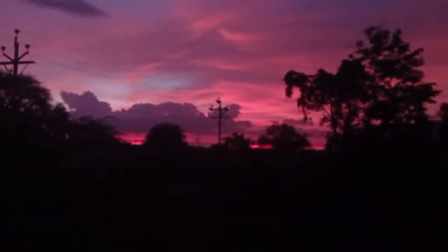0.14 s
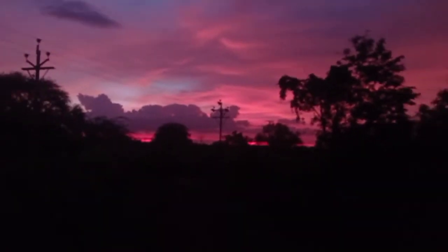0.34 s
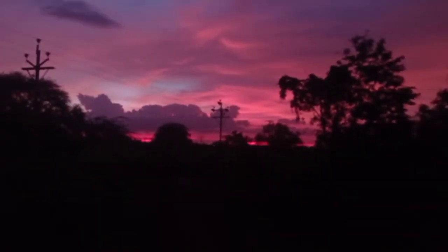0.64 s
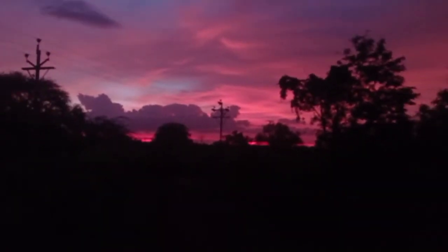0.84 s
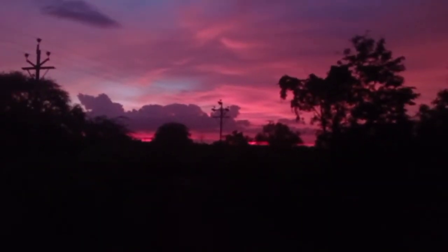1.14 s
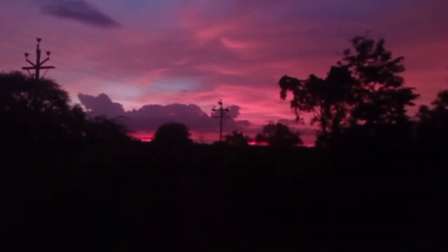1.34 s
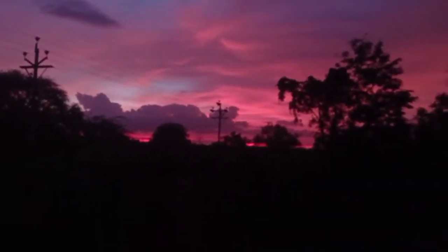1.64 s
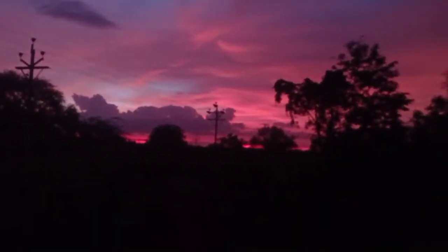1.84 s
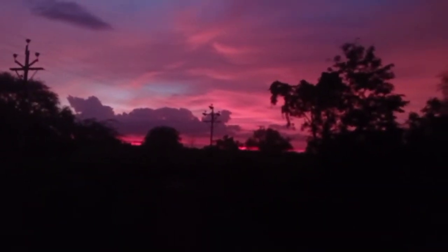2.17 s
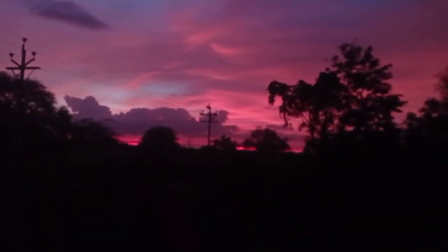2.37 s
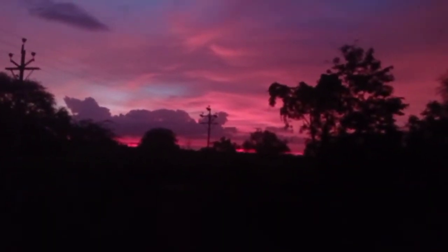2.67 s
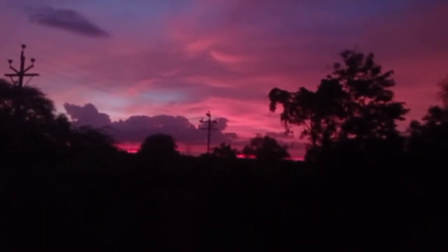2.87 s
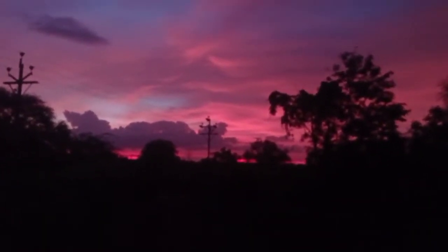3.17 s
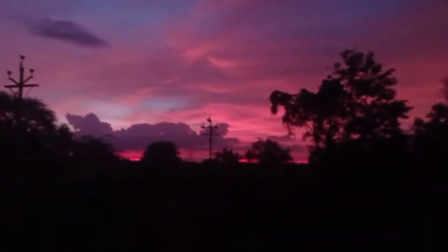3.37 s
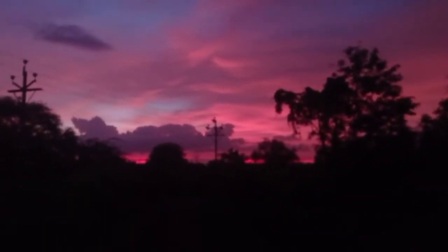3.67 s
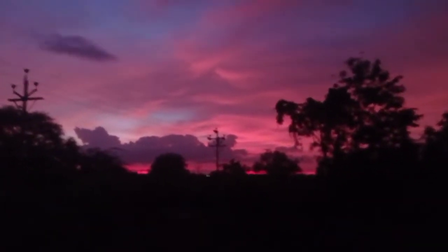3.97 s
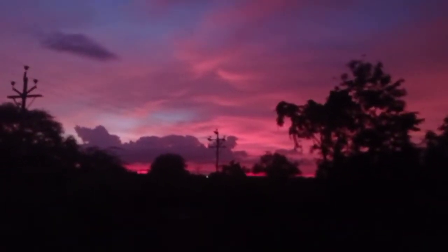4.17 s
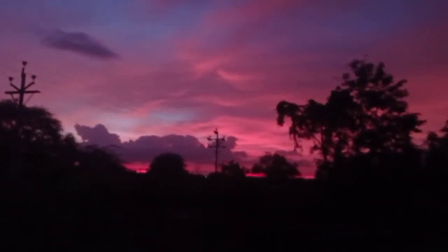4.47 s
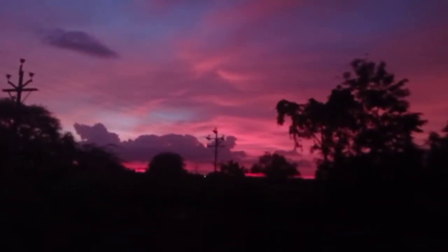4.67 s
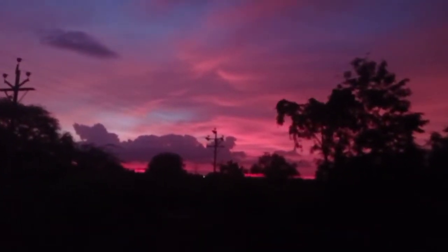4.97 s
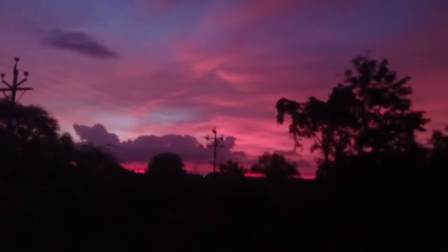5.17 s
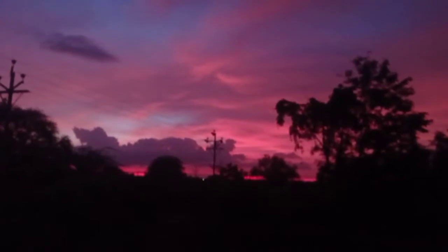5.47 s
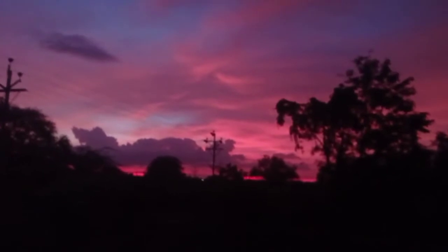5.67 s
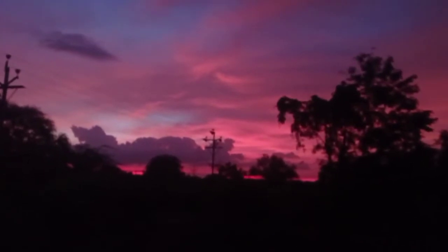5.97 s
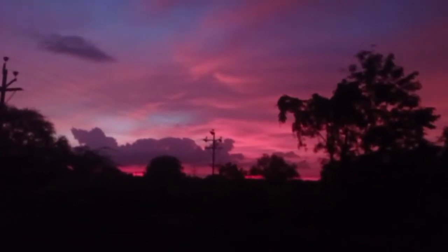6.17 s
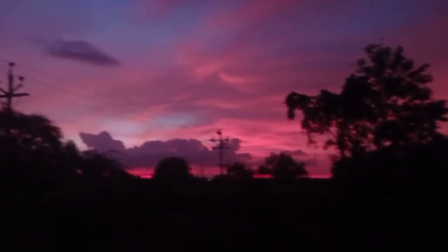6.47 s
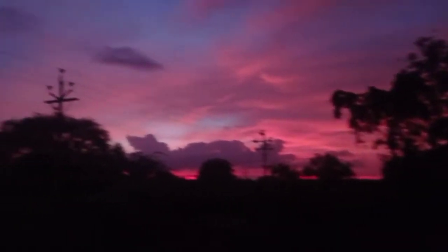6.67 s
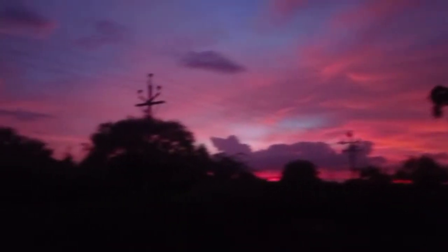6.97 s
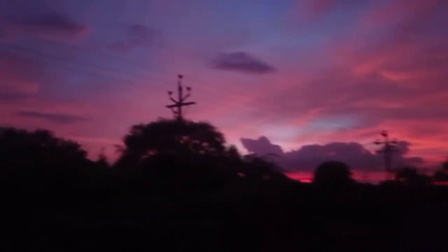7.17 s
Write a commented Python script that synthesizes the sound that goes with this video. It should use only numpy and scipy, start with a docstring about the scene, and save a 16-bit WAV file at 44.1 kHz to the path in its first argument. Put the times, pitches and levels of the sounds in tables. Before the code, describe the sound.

Small songbirds call outdoors over soft evening air and a faint low motor hum. After a single close whistle, quieter birds take over with chips, warbled phrases, a far trill, a raspy buzz on the left and a quick twitter, all lightly echoed by leaves. About halfway through, a bird near the microphone on the right swells into a loud, high trill, about ten falling notes a second, and keeps going.

```python
"""Dusk in open scrub, with what are most likely small songbirds. A near bird on the right ends a trill
(a fast run of whistled notes). While it rests, short chips come from the left, a bird warbles, and a far
one starts its own trill. Rough whistles on the left lead up to a buzz, and a twitter follows. Then the
near bird returns, repeating a sliding whistle ten times a second. All along, leaves scatter the calls
over soft evening air and a faint distant hum."""
import sys
import numpy as np
from scipy import signal
from scipy.fft import rfft, irfft, next_fast_len
from scipy.io import wavfile
from scipy.ndimage import uniform_filter1d, map_coordinates

SR = 44100
rng = np.random.default_rng(int(sys.argv[2]) if len(sys.argv) > 2 else 0)


def persist_wave(psi):
    """Save psi, clipped to +-1, as 16-bit WAV."""
    counts = np.round(np.clip(psi, -1, 1) * 32767).astype(np.int16)
    wavfile.write(sys.argv[1], SR, np.atleast_2d(counts).T)


N = 323253


def near_bird(full_db=-14, warm_up_s=0.29):
    """Each note flicks up to a crest, holds near 5 kHz and slides down; no two are quite alike."""
    # loudness through one note; the voice almost stops at the crest: t/s, level/dB
    note_level = [(-.017, -40), (-.013, -18), (-.007, -7), (-.003, -29), (0, -7), (.004, .5), (.013, -1.3),
                  (.025, -11.5), (.036, -8), (.047, -11), (.055, -17), (.06, -38)]
    # notes where the tempo shifts a little: t/s
    tempo_marks = [4.07, 4.581, 5.178, 5.96, 6.259, 6.564, 6.862, 7.271]
    # the left side is shaded from this bird: f/Hz, left minus right/dB
    shade = [(3300, -9.5), (4000, -11.5), (4700, -12.5), (5250, -11.5), (5700, -32), (6500, -9.5),
             (8000, -17)]
    # single trees throw the whole note back: delay/s, level/dB
    trees = [(.03, -42), (.087, -40.5)]
    flick_hz, crest_s = 5900, -0.0025  # the crest comes just before the note's time 0
    out = np.zeros((2, N))
    t, shape_db = contour(note_level)
    shape_hz, slide = note_pitch(t, flick_hz, crest_s)
    sliding = np.minimum(2 * slide, 1)
    flicking = np.clip(t / crest_s, 0, 1)  # 1 up to the crest, 0 from time 0 on
    times = beats(tempo_marks)
    notes = [(0.00059, -4, 0)]  # the last note before the rest
    # a "cold" voice is soft and a little high; it warms up as the trill goes on
    notes += [(s, 0, np.exp(-((s - times[0]) / warm_up_s) ** 1.06)) for s in times]
    for s, accent_db, cold in notes:
        sharp, loud, bright = rng.standard_normal(3)
        held_db = full_db + accent_db - 23 * cold + 0.22 * loud
        cold_rise = cold * (0.066 * (1 - flicking) + 0.049 * sliding)
        hz = shape_hz * (1 + cold_rise + 0.00824 * sharp)
        hz *= 1 + 0.0079 * wander(t, 235.4) + 0.012 * sliding * wander(t, 66.7)  # the slide wavers more
        # some notes sound rough at the crest
        roughness = 0.26 * rng.random() ** 2 * np.maximum(shape_hz / flick_hz - 1, 0)
        hz *= 1 + roughness * wander(t, 2437)
        flutter_db = 1.5 * (.5 + sliding) * wander(t, 241.4)
        db = held_db + shape_db + 7 * cold * (sliding + flicking) + flutter_db
        # soft notes are less pure, and the flick is brighter than the slide
        overtone_db = -36 - 0.94 * (held_db + 14.5) + 3 * bright + 3.5 * wander(t, 71)
        overtone_db += 6 * flicking - 4 * sliding
        hiss = undb(held_db - 44 + shape_db / 2) * rng.standard_normal(len(t))
        right = whistle(hz, db, overtone_db, overtone_db - 8) + hiss
        left = right * undb(np.interp(hz, *np.transpose(shade)))
        add(out, s + t[0], np.array([left, right]))
    # the bird turns its head, so the leaves catch more or less of each note
    scattered = out[1] * undb(2.9 * wander(np.arange(N) / SR, 10))
    echoes = foliage(scattered, early_db=-21, late_db=-31.5, early_s=0.059, late_s=0.2)
    for delay, tree_db in trees:
        add(echoes, delay, undb(tree_db) * scattered)
    return out + pan(echoes, 1.2)


def note_pitch(t, flick_hz, crest_s):
    """Pitch of the near bird's note, and how far down its slide it is (0 to 1)."""
    crest_hz, held_hz, end_hz, sag_hz_per_s = 8600, 5400, 3200, 7000
    flick_s, settle_s, slide_start_s, slide_end_s = 0.005, 0.0024, 0.014, .06
    progress = np.clip((t - slide_start_s) / (slide_end_s - slide_start_s), 0, 1)
    slide = (1 - np.cos(np.pi * progress)) / 2
    from_crest = np.abs(t - crest_s)
    rising = flick_hz + (crest_hz - flick_hz) * np.exp(-from_crest / flick_s)
    held = held_hz - sag_hz_per_s * np.clip(t, 0, slide_start_s)
    falling = held + (crest_hz - held_hz) * np.exp(-from_crest / settle_s) + (end_hz - held) * slide
    return np.where(t < crest_s, rising, falling), slide


def far_bird():
    """The same kind of trill, pitched higher and further off; it swells and fades."""
    # one note, timed from its held part: t/s, f/Hz, level/dB
    note_shape = [(-.021, 6890, -21), (-.016, 7710, -30), (-.011, 8900, -26), (-.005, 6853, -11),
                  (0, 6525, -5), (.008, 6444, -11), (.016, 6300, -30), (.026, 5500, -11), (.035, 4620, -13),
                  (.044, 4070, -10), (.054, 3600, -29)]
    # the trill runs evenly between these notes: t/s, level/dB
    tempo_marks = [(1.138, -54), (1.439, -46.5), (1.928, -43.5), (2.128, -42), (2.933, -45), (3.458, -47.5)]
    out = np.zeros(N)
    t, shape_hz, shape_db = contour(note_shape)
    marks, marks_db = np.transpose(tempo_marks)
    for s in beats(marks):
        hz = shape_hz * (1 + 0.0015 * wander(t, 154))
        db = shape_db + np.interp(s, marks, marks_db) + 0.45 * wander(t, 212)
        add(out, s + t[0], whistle(hz, db, second_db=-35))
    return pan(out, -4.5) + foliage(out, early_db=-10, late_db=-12.5, early_s=0.053, late_s=0.65)


def warbler(wobble_hz=205):
    """A bird straight ahead sings three-note phrases whose pitch wobbles quickly."""
    # the shapes of the three notes: t/s, f/Hz, level/dB, wobble depth/Hz
    hook = [(0, 6100, -20, 235), (.016, 5560, -5, 336), (.033, 5410, -2, 315), (.046, 5700, -5, 302),
            (.055, 7340, -4.5, 11), (.063, 5690, -2.5, 0), (.072, 4270, -0.5, 0), (.089, 4100, -11, 0)]
    sag = [(0, 6200, -7, 400), (.015, 5600, -8.5, 500), (.03, 4700, 2, 350), (.042, 4600, -27, 300),
           (.053, 4630, -6, 300)]
    fall = [(0, 5300, -3, 320), (.014, 6210, -12, 513), (.026, 5200, -2.5, 303), (.037, 4300, -1, 100),
            (.048, 3860, -20, 0)]
    # each phrase: t/s, level/dB, pitch factor, delay of the sag/s, delay of the fall/s
    phrases = [(.88, -49.5, .98, 0.11, 0.16), (1.344, -47.5, 1.013, .098, 0.16),
               (1.965, -45.5, 1.0, .1, .157), (2.561, -47.5, 1.013, 0.12, 0.16)]
    out = np.zeros(N)
    for s, phrase_db, pitch, sag_s, fall_s in phrases:
        for shape, delay in ((hook, 0), (sag, sag_s), (fall, fall_s)):
            t, hz, shape_db, depth_hz = contour(shape)
            wobble = depth_hz * np.sin(2 * np.pi * wobble_hz * t + 1.78 * wander(t, 113))
            db = shape_db + phrase_db + 0.71 * wander(t, 160)
            add(out, s + delay, whistle(pitch * hz + wobble, db, second_db=-20))
    return pan(out, 1.1) + foliage(out, early_db=-10.5, late_db=-17.5, early_s=0.068, late_s=0.54)


def buzzing_bird(start_s=2.03, end_s=2.7, rate_hz=75, slowing_hz_per_s=5.8, fade_db_per_s=6.5):
    """Some seventy times a second the voice whips down and up; leaves smear the sweeps into a rasp."""
    # the sweeps in one cycle: t/s, length/s, start f/Hz, end f/Hz, level/dB
    cycle = [(0, 0.004, 6010, 3500, -7.5), (.002, 0.0085, 5450, 4520, -8.5), (.004, .0045, 4180, 2450, 3.5),
             (.0085, 0.0029, 2270, 3880, -0.5)]
    out = np.zeros(N)
    t = np.arange(0, end_s - start_s, 1 / SR)
    cycles_done = np.floor(np.cumsum(rate_hz - slowing_hz_per_s * t) / SR)
    for age in t[np.flatnonzero(np.diff(cycles_done))]:
        db = -40.5 - fade_db_per_s * age
        swell = min(age / 0.042, 1)
        for delay, length, start_hz, end_hz, sweep_db in cycle:
            soft, sharp = rng.standard_normal(2)
            pitch = 1 + 0.045 * sharp
            sweep = glide(length, start_hz * pitch, end_hz * pitch, db + sweep_db - soft)
            add(out, start_s + age + delay, swell * sweep)
    # the throat lets only one band of pitches through
    out = colour(out, lambda f: 1 / np.sqrt((1 + (2250 / f) ** 16) * (1 + (f / 5900) ** 24)))
    echoes = foliage(out, early_db=-5, late_db=-19.5, early_s=0.037, late_s=0.35)
    return pan(out * undb(-8), 5.2) + pan(echoes, 13.3)


def twitter():
    """A bird repeats one quick pattern of tiny slides, each falling by about a quarter."""
    # the slides in the pattern: t/s, length/s, top f/Hz, level/dB
    pattern = [(0, 0.012, 5480, 0), (0.014, 0.011, 5310, 0.5), (0.025, .0095, 5950, 0),
               (.037, 0.0069, 5230, -1)]
    # each time it is sung: t/s, level/dB, length factor, pitch factor
    repeats = [(2.959, -50, 0.78, 1.05), (3.016, -49.5, 1.07, 1.06), (3.095, -50, 0.94, 1.03),
               (3.176, -53, 0.91, 0.98), (3.344, -48, 0.93, 0.99), (3.416, -47.5, 1.03, 1),
               (3.502, -50.5, .95, 0.95), (3.747, -47.5, .92, 1.04), (3.818, -43, 0.87, 0.94)]
    out = np.zeros(N)
    for s, repeat_db, stretch, pitch in repeats:
        for delay, length, top_hz, slide_db in pattern:
            sharp, shallow, loud = rng.standard_normal(3)
            start_hz = top_hz * pitch * (1 + 0.0252 * sharp)
            end_hz = 0.74 * start_hz * (1 + 0.15 * shallow)
            db = repeat_db + slide_db + 0.5 * loud
            slide = glide(length * stretch, start_hz, end_hz, db, bend=2.53, second_db=-18)
            add(out, s + delay * stretch, slide)
    return pan(out, -0.8) + foliage(out, early_db=-12.5, late_db=-19.5, early_s=0.078, late_s=0.95)


def left_calls(rasp_db=2.5, rasp_hz=250):
    """Short chips, soft whistles from distant trees, and the rough notes that climb to the buzz."""
    # the three kinds of call: t/s, length/s, start f/Hz, end f/Hz, level/dB
    chips = [(.284, 0.012, 3270, 3570, -53.5), (.428, .0068, 4200, 5470, -52),
             (0.486, 0.0042, 4250, 4700, -49), (0.493, 0.0055, 3980, 5800, -47.5),
             (.527, 0.012, 3480, 3260, -47.5), (0.553, .018, 3140, 2400, -57.5)]
    soft_whistles = [(.615, 0.072, 2800, 2350, -71), (4.238, 0.078, 3160, 3050, -63),
                     (4.752, 0.051, 2930, 2860, -65.5), (4.854, 0.088, 2730, 2200, -67.5)]
    rough_notes = [(1.567, 0.014, 1200, 1180, -61), (1.63, .14, 813, 841, -67),
                   (1.803, 0.045, 2130, 2005, -62), (1.832, 0.023, 2073, 1990, -48),
                   (1.849, 0.12, 2140, 2110, -67), (1.856, 0.013, 1560, 2020, -56),
                   (1.883, .071, 5900, 5730, -63.5), (1.981, 0.0089, 2180, 2560, -47),
                   (1.994, 0.031, 2475, 2525, -54), (2.025, 0.014, 3345, 3240, -36.5)]
    out = np.zeros(N)
    for s, *note in chips + soft_whistles:
        add(out, s, glide(*note, second_db=-22))
    for s, *note in rough_notes:
        tone = glide(*note, second_db=-27)
        rasp = undb(rasp_db * wander(np.arange(len(tone)) / SR, rasp_hz))
        add(out, s, tone * rasp)
    return pan(out, 13.4) + foliage(out, early_db=-3, late_db=-16.5, early_s=0.053, late_s=1.0)


def far_whistlers(count=120, lull_db=-6):
    """Faint whistles from distant trees, heard only as a blur of echoes; they ease off midway."""
    out = np.zeros(N)
    for k, (when, pitch, slope) in enumerate(rng.uniform(-1.7, 1, (count, 3))):
        hz = 2650 * (1 + pitch / 10)
        db = -73 + lull_db * np.sin(np.pi * k / count) ** 2
        call = glide(.04, hz * (1 - slope / 10), hz * (1 + slope / 10), db)
        add(out, (k + when / 2) * N / SR / count, call)
    return pan(foliage(out, early_db=3.5, late_db=-11, early_s=0.34, late_s=0.8), 3)


def evening_air(alike_below_hz=220):
    """Soft even noise, alike on both sides in the bass, with a drone and a blur of far callers."""
    # how strong the air's noise is from low to high: f/Hz, relative level/dB
    spectrum = [(15, -36), (25, -3.5), (81, -6), (131, -6.5), (176, -12.5), (237, -4.5), (293, -8),
                (415, -10.5), (927, -17), (1060, -18), (1420, -20), (2930, -17.5), (7280, -22),
                (12800, -23), (15000, -66)]
    # a distant drone and a far chorus: centre f/Hz, width/Hz, level/dB
    far_bands = [(229, 16.7, -80), (2470, 2100, -79.5)]
    hz, db = np.transpose(spectrum)
    noise = rng.standard_normal((2, N))
    mid, side = colour(noise, lambda f: undb(np.interp(np.log(f), np.log(hz), db)))
    side = colour(side, lambda f: 0.98 * f / np.hypot(f, alike_below_hz))
    out = undb(-69.5) * np.array([mid + side, mid - side]) / mid.std()
    for centre, width, band_db in far_bands:
        band = colour(rng.standard_normal(N), lambda f: 1 / (1 + (2 * (f - centre) / width) ** 2))
        out += undb(band_db) * band / band.std()
    return pan(out, 1.7)


def motor_hum(hz=79.8, db=-72.5):
    """A distant motor gives one low, nearly steady tone."""
    t = np.arange(N) / SR
    phase = 2 * np.pi * np.cumsum(hz + 1.22 * wander(t, 11)) / SR
    return pan(undb(db + 0.91 * wander(t, 10)) * np.sin(phase), 2.2)


def foliage(x, early_db, late_db, early_s, late_s):
    """Close leaves scatter a call at once; far trees return a long, weak tail."""
    t = np.arange(int(.8 * SR)) / SR
    response = 0
    for db, fade_s in ((early_db, early_s), (late_db, late_s)):  # fade_s: time to fall by 60 dB
        onset = 1 - np.exp(-t / 0.0011)
        echoes = rng.standard_normal((2, len(t))) * undb(-60 * t / fade_s) * onset
        response = response + undb(db) * echoes / np.sqrt(np.sum(echoes ** 2) / 2)
    return signal.fftconvolve(x[None], response, axes=1)[:, :N]


def whistle(hz, db, second_db=-30, third_db=-50):
    """A bird's nearly pure tone; of its weak overtones mainly those near 12 kHz get out."""
    phase = 2 * np.pi * np.cumsum(hz) / SR
    tone = np.sin(phase)
    for k, overtone_db in ((2, second_db), (3, third_db)):
        beak_db = np.interp(k * hz, [8000, 10500, 13000, 15500, 20000], [-16, -1, 4, -4, -60])
        tone += undb(overtone_db + beak_db) * np.sin(k * phase)
    return undb(db) * tone


def glide(length, start_hz, end_hz, db, bend=1, second_db=-28):
    """One short sliding whistle that swells and fades; bend over 1 holds the start pitch longer."""
    progress = np.linspace(0, 1, max(int(length * SR), 8))
    hz = start_hz + (end_hz - start_hz) * progress ** bend
    return whistle(hz, db, second_db) * np.abs(np.sin(np.pi * progress)) ** .5


def beats(marks, gap_s=.1):
    """Note times of a trill, about gap_s apart and evenly spaced from each mark to the next."""
    runs = [np.linspace(a, b, max(round((b - a) / gap_s), 1), endpoint=False)
            for a, b in zip(marks, marks[1:])]
    return np.concatenate(runs + [[marks[-1]]])


def contour(rows):
    """Join a table's rows into smooth curves: the times, then one curve for each other column."""
    s, *columns = np.transpose(rows)
    t = np.arange(s[0], s[-1], 1 / SR)
    return [t] + [uniform_filter1d(np.interp(t, s, c), 45, mode="nearest") for c in columns]


def wander(t, rate):
    """Smooth random motion, about 1 in size, taking rate steps a second."""
    steps = rng.standard_normal(256)
    return map_coordinates(steps, [(t - t[0]) * rate], order=3, mode="mirror")


def colour(x, gain):
    """Make each frequency f in x stronger or weaker by gain(f)."""
    size = next_fast_len(N, real=True)
    f = np.maximum(np.fft.rfftfreq(size, 1 / SR), 1)
    return irfft(rfft(x, size) * gain(f), size)[..., :N]


def pan(x, db):
    """Place a sound so that it is db louder on the left than on the right."""
    return x * undb(np.array([[db], [-db]]) / 2)


def add(out, s, x):
    """Mix x into out from time s on."""
    i = int(round(s * SR))
    a, b = max(i, 0), min(i + x.shape[-1], N)
    if b > a:
        out[..., a:b] += x[..., a - i:b - i]


def undb(db):
    """Turn decibels into a factor to multiply by."""
    return 10 ** (np.asarray(db) / 20)


def scene():
    """All the birds over the hum and the evening air."""
    birds = near_bird() + far_bird() + warbler() + twitter() + left_calls() + buzzing_bird()
    return birds + far_whistlers() + motor_hum() + evening_air()


def record(dry, top_hz=15700):
    """The recorder cuts off the highest treble."""
    return signal.sosfilt(signal.ellip(10, .1, 70, top_hz, fs=SR, output="sos"), dry)


dry = scene()
out = record(dry)
persist_wave(out)
```